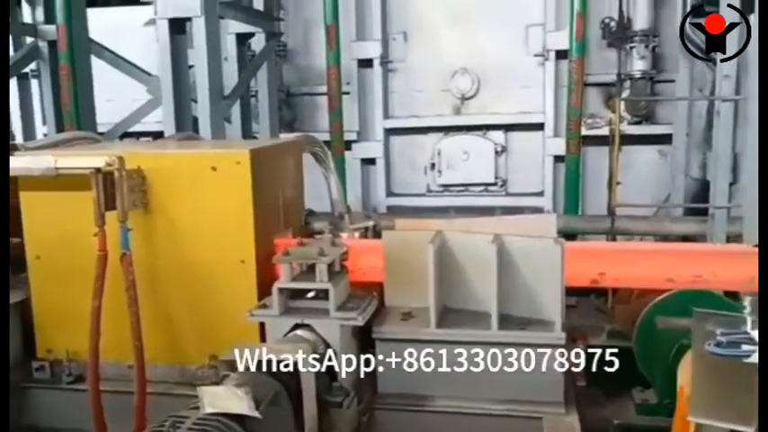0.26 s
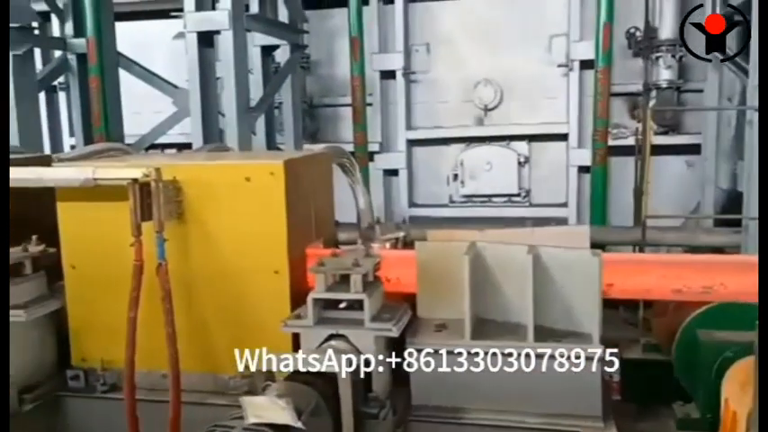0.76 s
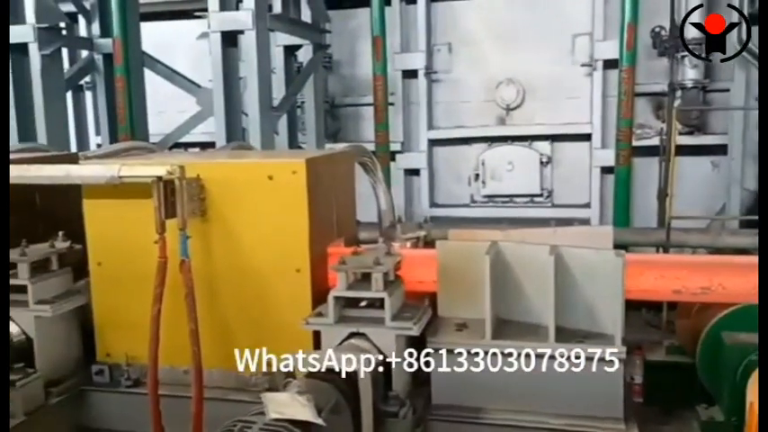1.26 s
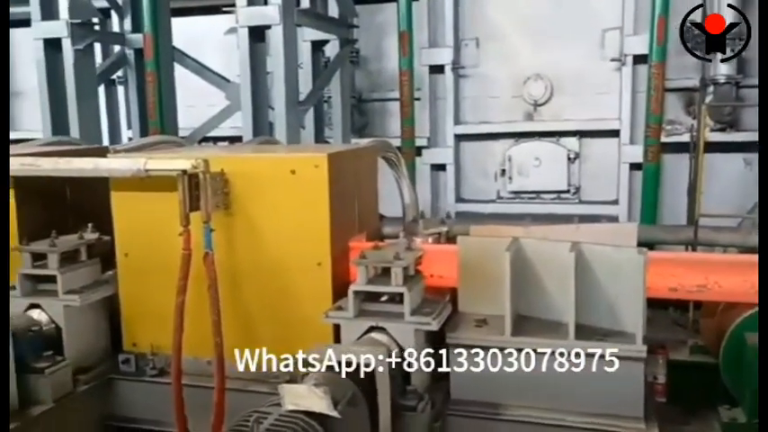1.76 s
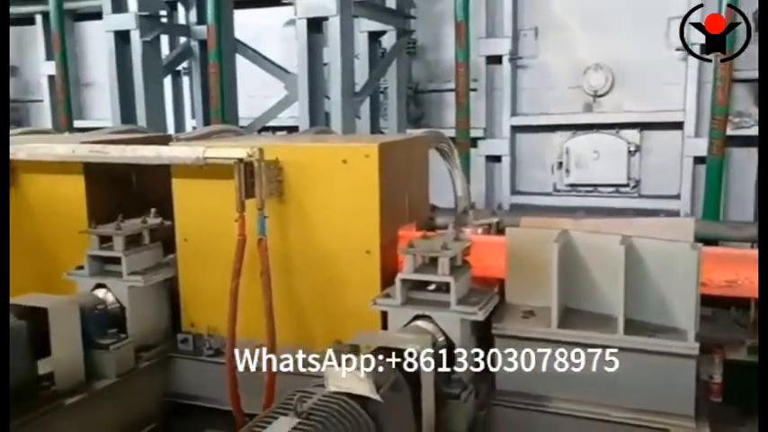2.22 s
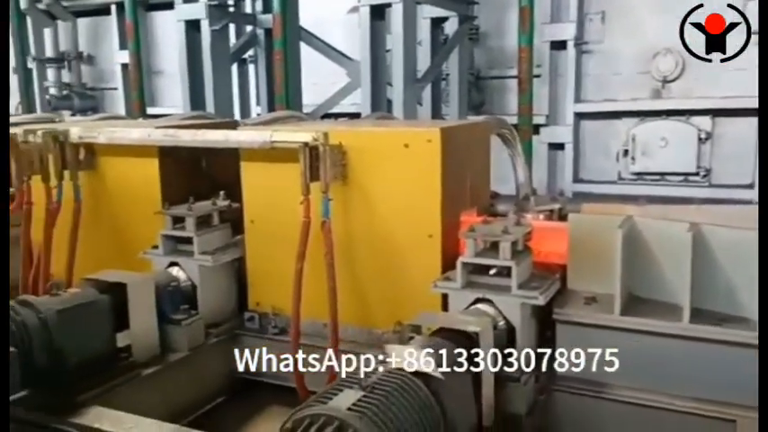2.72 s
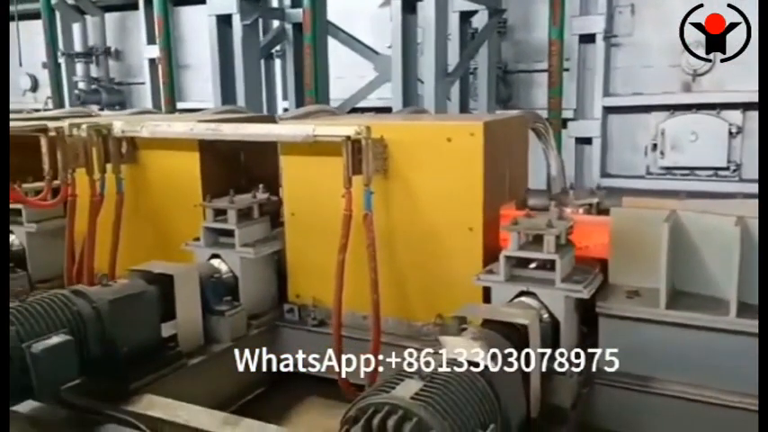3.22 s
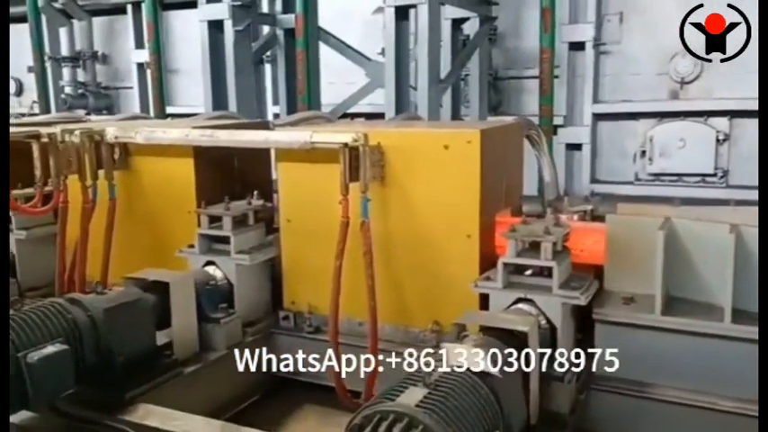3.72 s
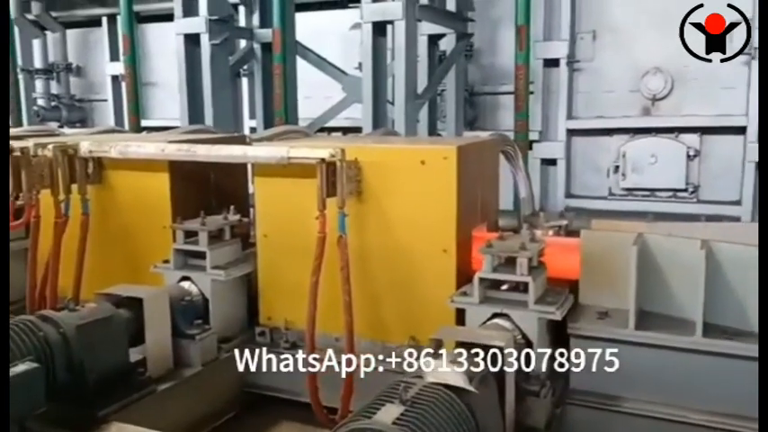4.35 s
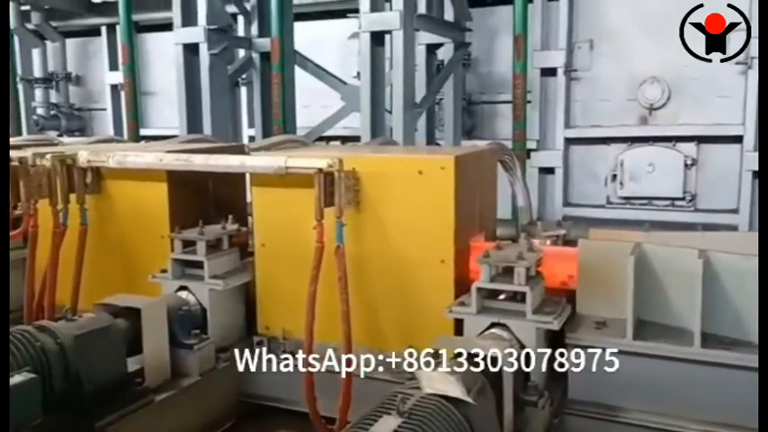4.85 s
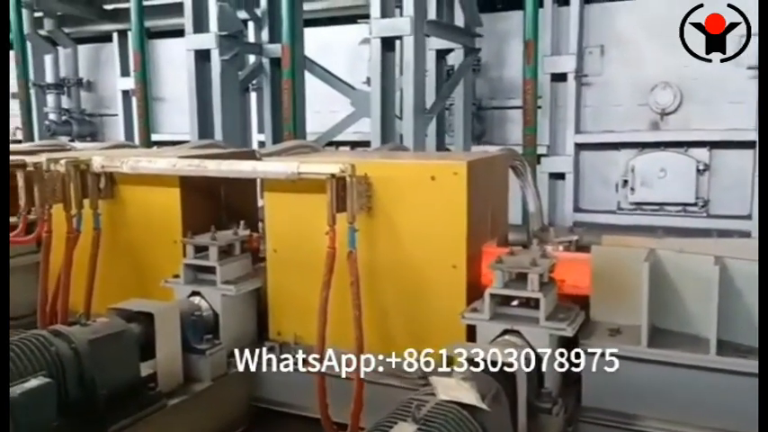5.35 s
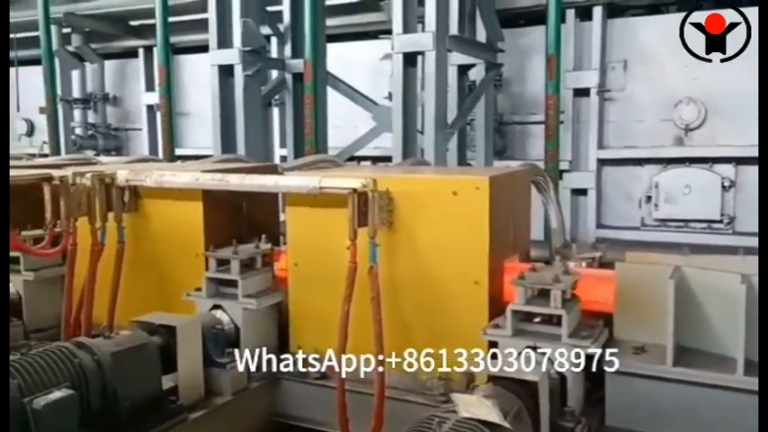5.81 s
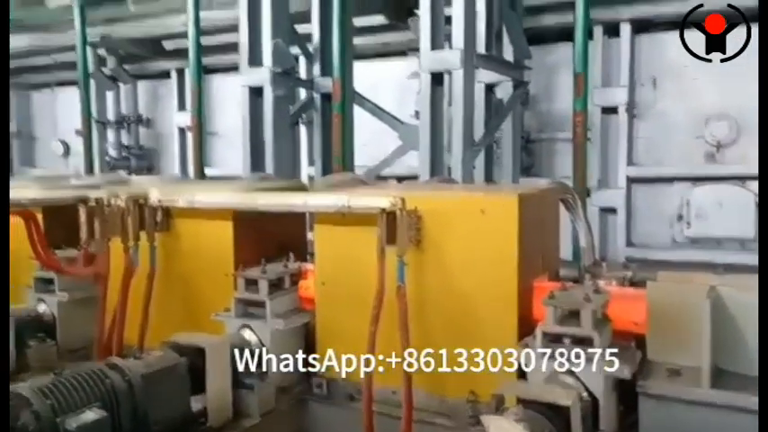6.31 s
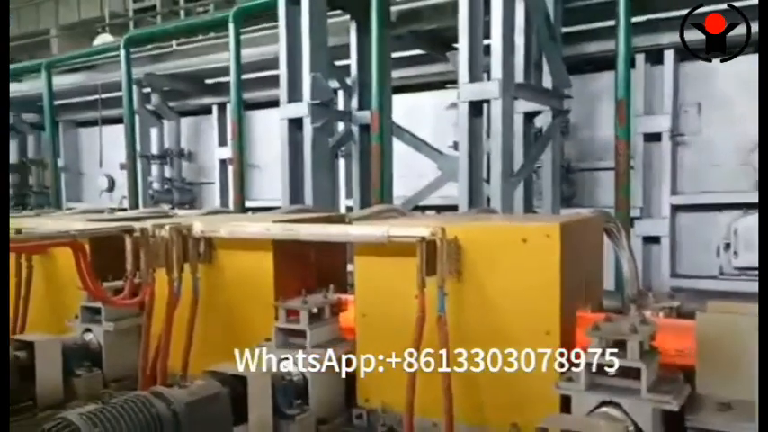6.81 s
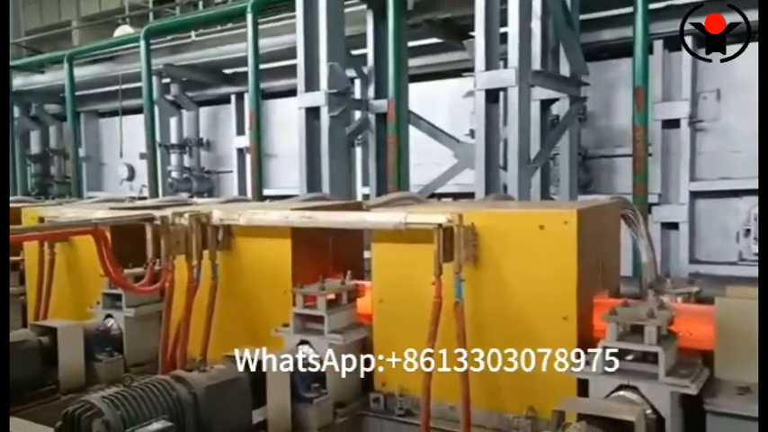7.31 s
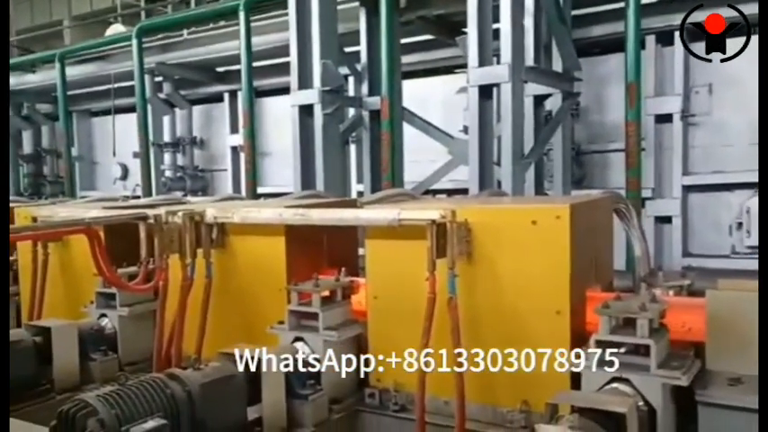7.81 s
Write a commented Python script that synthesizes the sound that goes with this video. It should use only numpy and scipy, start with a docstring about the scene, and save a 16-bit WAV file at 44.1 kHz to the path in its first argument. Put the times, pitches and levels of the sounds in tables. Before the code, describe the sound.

A loud, narrow electrical whine around 1500 Hz fills a factory hall, heard from a few metres by a moving hand-held microphone. From 0 to 3 s it creeps upward, beating with a steady, slightly lower whine, strongest near 0.6 s; the throbbing quickens as they separate. The tone swells and sinks, with a tiny dropout at 1.6 s and a deep dip near 2.2 s. Faint overtones flicker. Underneath run lumpy low conveyor rumble, dense dull roller knocks, wavering motor hum and restless water and fan hiss. Just after 3.2 s this background jumps forward and a barely audible very high whistle enters. From 3.7 s the main whine is strong, levelling near 1554 Hz by 4.5 s. Rollers ring roughly and briefly around 1.8, 4.7 and 7.7 s. A heavy rumble surge comes at 5.6 s; the background eases after 6 s, and the whine edges upward again from 7 s until the end.

```python
"""A factory hall from a few metres, walking past two induction coils that heat a steel bar.
From the start the near coil's whine climbs as its load changes, beating with a steady far coil; a dropout nicks both at 1.6 s.
After 3.2 s the recorder's gain lifts the background and a faint high whistle enters; the climb levels off by 4.5 s
and resumes near the end. Standing waves swell and cut the near coil's partials; random force and knocks make the conveyor
rumble. Drive motors hum in fading tones, filtered noise is the hiss of water and fans, and rollers ring three times."""
import sys
import numpy as np
from scipy import signal
from scipy.fft import rfft, irfft, next_fast_len
from scipy.io import wavfile
from scipy.ndimage import uniform_filter1d

SR = 44100
rng = np.random.default_rng(int(sys.argv[2]) if len(sys.argv) > 2 else 0)


def waveform_to_disk(signal):
    """Save audio, clipped to [-1, 1], as 16-bit WAV at the path in sys.argv[1]."""
    frames = np.transpose(np.atleast_2d(signal))
    scaled = np.clip(frames, -1, 1) * 32767
    samples = np.round(scaled).astype(np.int16)
    wavfile.write(sys.argv[1], SR, samples)


N = 355887
TIME = np.arange(N) / SR  # seconds


def undb(db):
    """Decibels to gain."""
    return 10 ** (np.asarray(db) / 20)


def curves(table):
    """Each column of a table, joined by straight lines in time."""
    s, *columns = np.transpose(table)
    return [np.interp(TIME, s, column) for column in columns]


def unit(x):
    """Scale to rms 1."""
    return x / np.sqrt(np.mean(x ** 2))


def bell(s, half_width):
    """A smooth rise to 1 and fall around a moment."""
    return np.exp(-((TIME - s) / half_width) ** 2)


def colour(x, points):
    """Shape a signal's spectrum by (Hz, dB) points, joined on a logarithmic frequency axis; rms 1."""
    hz, db = np.transpose(points)
    size = next_fast_len(N)
    bins = np.maximum(np.arange(size // 2 + 1) * SR / size, 1)
    gain = undb(np.interp(np.log(bins), np.log(hz), db))
    return unit(irfft(rfft(x, size) * gain, size)[:N])


def butter(x, hz, kind, order):
    """Butterworth filter."""
    return signal.sosfilt(signal.butter(order, hz, kind, fs=SR, output="sos"), x)


def walk(rate):
    """Smooth random drift with about `rate` turns a second; rms 1."""
    hold = max(int(SR / rate), 1)
    steps = np.repeat(rng.standard_normal(N // hold + 1), hold)
    smooth = uniform_filter1d(uniform_filter1d(steps, hold), hold)
    return unit(smooth[:N])


def flutter(depth_db, width_hz):
    """Fast, shallow random shiver: low-passed noise whose rms is `depth_db` against 1."""
    return undb(depth_db) * unit(butter(rng.standard_normal(N), width_hz, "low", order=3))


def partial(phase, db):
    """A sinusoid of the given rms level."""
    return np.sqrt(2) * undb(db) * np.cos(phase)


def wander(rate):
    """Complex gain of a sound that arrives by many changing paths; rms 1."""
    return (walk(rate) + 1j * walk(rate)) / np.sqrt(2)


def wavering(hz, db, rate):
    """A tone that keeps fading and returning, about `rate` times a second."""
    path = wander(rate)
    return abs(path) * partial(2 * np.pi * hz * TIME + np.angle(path), db)


def churn(x, depth_db, rate, lo_hz, hi_hz, count):
    """Let each of `count` overlapping bands of a noise swell and sink on its own."""
    size = next_fast_len(N)
    spectrum = rfft(x, size)
    hz = np.maximum(np.arange(len(spectrum)) * SR / size, 1)
    band = np.interp(np.log(hz), np.log([lo_hz, hi_hz]), [0, count - 1])
    out = 0
    for k in range(count):
        share = np.maximum(1 - abs(band - k), 0)  # neighbouring shares add up to 1
        out = out + irfft(spectrum * share, size)[:N] * undb(depth_db * walk(rate))
    return unit(out)


def cooling(gain_db):
    """Restless hiss of water and fans: coloured noise with churning bands and a level that drifts."""
    # spectrum of the hiss: pitch_hz, relative_level_db
    hiss_spectrum = [(700, -18.5), (1200, -1), (1800, 0.5), (2350, 2), (2900, -0.5), (4200, -2.5),
                     (6000, -4.5), (7000, -6.5), (7750, -9.5), (8200, -27), (10000, -27), (14000, -38),
                     (15200, -30)]
    # the hiss swells or dips briefly: centre_s, half_width_s, gain_db
    hiss_shifts = [(0.33, 0.023, 0), (2.1, 0.18, -0.5), (2.62, .035, -1.5), (2.82, 0.021, -3),
                   (2.88, .025, 1), (2.94, .02, -8), (3.03, .02, -5.5), (3.35, .06, 2), (4.0, 0.092, -3),
                   (4.2, .03, 1.5), (4.42, 0.046, -1.5), (6.2, 0.14, -1), (7.95, .15, 0)]
    hiss = colour(rng.standard_normal(N), hiss_spectrum)
    hiss = churn(hiss, depth_db=3.0, rate=50, lo_hz=1207, hi_hz=16080, count=54)
    shifts_db = sum(db * bell(s, width) for s, width, db in hiss_shifts)
    base_db, follow = -34.5, 0.79  # follow: dB for each dB of the recorder's gain
    return hiss * undb(base_db + follow * gain_db + shifts_db + 0.54 * walk(42))


def motors(gain_db):
    """Broken hum of the roller drives: tones that fade and return, following the recorder's gain."""
    # hum of drive motors and gears, before the common gain: pitch_hz, relative_level_db
    hum_tones = [(76.5, -53), (150.3, -47), (300.7, -45), (362, -51), (446, -54), (634, -51), (744, -52),
                 (775, -55)]
    hum = sum(wavering(hz, db, rate=16) for hz, db in hum_tones)
    return hum * undb(1.2 * gain_db - 3.5)


def knocks(rate, spread_db):
    """Dense little impacts of very unequal size, about `rate` a second; rms 1."""
    hit = rng.random(N) < rate / SR
    size_db = spread_db * np.minimum(rng.exponential(size=N), 4)
    return unit(hit * rng.standard_normal(N) * undb(size_db))


def conveyor(gain_db):
    """Rolling contact and small knocks shake the frame (low) and ring the rollers (middle)."""
    # spectrum of frame and rollers, each part levelled afterwards: pitch_hz, relative_level_db
    conveyor_spectrum = [(15, -57), (25, -28.5), (43, -22.5), (67, -11.5), (139, 2.5), (172, -1.5),
                         (200, 0), (228, -4), (306, -5), (431, -6.5), (476, -7.5), (618, -8.5), (705, -8.5),
                         (765, -5.5), (1250, -17.5), (1620, -49.5), (2750, -120)]
    # the conveyor labours or eases for a moment: centre_s, half_width_s, rumble_gain_db, clatter_gain_db
    surges = [(0.04, .06, 8.5, -0.5), (0.31, 0.044, 3.5, 4.5), (0.45, 0.079, 3.5, 0), (0.7, 0.033, -5, 1),
              (1.25, 0.093, 1.5, 2), (1.64, 0.08, 5, 1.5), (1.78, .025, -6, 0), (1.95, 0.031, 4, 3),
              (2.12, .06, -6, -1), (2.3, 0.044, 0, 4), (2.45, 0.036, -5.5, -0.5), (2.74, 0.056, 7.5, 2),
              (3.12, 0.061, 0, -3.5), (3.3, .1, -6.5, 2.5), (3.55, 0.044, 6, -3), (3.73, .03, -4, 0),
              (4.1, 0.14, 1, 3), (4.23, .035, 4.5, 3), (4.36, .03, -4, 1), (4.55, 0.043, 2, 4),
              (4.74, 0.077, 2, 3.5), (4.93, .03, -5.5, -1), (5.19, 0.027, -8.5, 0), (5.56, 0.041, 11, 0.5),
              (5.76, .035, 5.5, -1), (6.09, .04, 2, -1.5), (6.19, 0.038, -8.5, -4.5), (7.25, 0.18, 1, 2.2)]
    shaking = colour(rng.standard_normal(N) + 0.56 * knocks(rate=500, spread_db=1.5), conveyor_spectrum)
    shaking = churn(shaking, depth_db=2.5, rate=16, lo_hz=89, hi_hz=1290, count=14)
    split_hz = 290
    frame = unit(butter(shaking, split_hz, "low", order=4))
    rollers = unit(butter(shaking, split_hz, "high", order=4))

    low_db, middle_db = sum(np.outer(gains, bell(s, width)) for s, width, *gains in surges)
    # base level, then dB for each dB of the recorder's gain
    rumble_db = -36.5 + 1.1 * gain_db + low_db + 1.4 * walk(22)
    clatter_db = -36 + 1.03 * gain_db + middle_db + 0.22 * walk(13)
    return frame * undb(rumble_db) + rollers * undb(clatter_db)


def roller_rings():
    """Single rollers sing roughly for a moment: a fast-wavering tone under a smooth swell."""
    # a roller rings up as the bar bears on it: centre_s, half_width_s, pitch_hz, crest_level_db
    rings = [(1.8, 0.4, 773, -50), (4.7, 0.21, 633, -37), (7.7, .2, 884, -44)]
    return sum(bell(s, width) * wavering(hz, db, rate=60) for s, width, hz, db in rings)


def whistle():
    """A faint high whistle: one sine with a wandering phase."""
    # thin whistle far above the whine: time_s, level_db
    whistle_level = [(3.3, -98), (3.6, -70.5), (4.3, -71), (4.8, -81.5), (8.07, -80)]
    whistle_hz = 10110
    db, = curves(whistle_level)
    return partial(2 * np.pi * whistle_hz * TIME + 1.2 * walk(20), db)


def standing_waves(order):
    """Complex gain of one partial along the microphone's path: it swells, and each null cuts it and flips its sign."""
    # brief or broad crests and troughs where a partial swells or sags: centre_s, partial_number, half_width_s, gain_db
    swells = [(0.39, 1, 0.035, -2.5), (0.47, 1, 0.025, 2.5), (0.61, 1, .04, 3.5), (1.14, 1, 0.03, 1),
              (1.31, 1, .025, -3), (1.4, 1, 0.077, 1), (2.8, 1, .03, 0.5), (2.94, 1, 0.017, -1),
              (3.03, 1, 0.034, 1.5), (3.42, 1, 0.039, 4.5), (3.95, 1, 0.064, 3.5), (4.41, 1, 0.038, -2),
              (4.68, 1, .04, -1.2), (7.06, 1, .05, -1), (7.38, 1, .04, 1.4), (7.47, 1, 0.032, -1.5),
              (7.67, 1, 0.17, 4), (0.57, 2, 0.059, 6), (0.86, 2, 0.06, -6), (0.97, 2, 0.034, 3.5),
              (1.2, 2, .05, -2), (1.48, 2, 0.071, -7), (1.58, 2, 0.029, 1.5), (1.86, 2, 0.033, 3.5),
              (2.18, 2, 0.17, 3), (2.56, 2, 0.13, 5.5), (2.92, 2, 0.021, -8), (3.44, 2, 0.16, 9.5),
              (5.45, 2, 0.47, 2.5), (6.7, 2, 0.59, -2.5), (7.28, 2, 0.15, -6), (7.9, 2, 0.56, 4),
              (0.3, 3, .06, 5.5), (0.52, 3, 0.1, 10), (0.68, 3, 0.038, -7), (0.8, 3, 0.075, 10.5),
              (1.15, 3, 0.2, 8.5), (1.55, 3, 0.093, 2), (2.38, 3, 0.3, 7), (3.13, 3, 0.062, 7.5),
              (3.61, 3, 0.083, 9.5), (3.76, 3, 0.066, 6.5), (5.25, 3, 0.35, 3.5), (5.75, 3, 0.11, 3),
              (7.63, 3, 0.078, 8), (7.95, 3, 0.13, 3.5), (0.62, 4, 0.05, 14), (0.87, 4, 0.045, 13),
              (2.5, 4, 0.092, 6.5), (2.93, 4, .1, 8), (3.68, 4, 0.25, 9.5), (4.25, 4, 0.41, 11),
              (5.1, 4, .27, 4), (6.25, 4, .2, 6), (6.76, 4, 0.097, 4.5), (7.2, 4, 0.23, 10.5),
              (7.6, 4, .05, 6), (7.9, 4, 0.12, 10)]
    # the microphone crosses a null; echoes leave a little: centre_s, partial_number, half_width_s, remainder_db
    nodes = [(0.8, 1, 0.15, -12), (2.25, 1, 0.17, -24), (3.33, 1, 0.067, -18), (0.24, 2, 0.1, -20),
             (0.419, 2, 0.055, -15), (0.745, 2, 0.11, -19.5), (1.68, 2, 0.073, -25), (1.99, 2, 0.11, -12),
             (2.79, 2, 0.2, -26), (3.82, 2, 0.065, -12), (4.08, 2, 0.077, -7), (6.69, 2, 0.074, -5),
             (0.18, 3, 0.07, -20), (0.41, 3, 0.025, -15), (1.8, 3, 0.2, -21.5), (2.77, 3, .04, -18),
             (2.99, 3, 0.06, -21), (3.3, 3, 0.064, -17), (4.58, 3, 0.64, -17.5), (6.28, 3, 0.13, -14),
             (6.53, 3, .06, -13), (6.97, 3, 0.11, -19), (7.38, 3, 0.054, -18), (0.25, 4, .12, -21),
             (2.1, 4, .35, -12), (3.3, 4, .2, -20), (5.65, 4, 0.24, -9.5), (6.07, 4, .06, -11),
             (6.56, 4, .05, -16), (6.95, 4, 0.068, -15), (7.5, 4, .04, -12), (7.72, 4, .04, -16)]
    gain = undb(sum(db * bell(s, width) for s, k, width, db in swells if round(k) == order))
    for s, k, width, remainder_db in nodes:
        if round(k) == order:
            direct = np.tanh((s - TIME) / width)
            remainder = 1j * undb(remainder_db) * bell(s, width)
            gain = gain * (direct - remainder)
    return gain


def coil(hz, levels_db, paths, ripple_db, shiver_db, jitter_db):
    """Magnetic force shakes the windings at the inverter's pitch and its multiples; pitch ripples, power shivers."""
    ripple_hz = 34.8
    sway = 0.069 * walk(22)  # the hand-held microphone moves through the waves
    ripple = undb(ripple_db) * np.sin(2 * np.pi * ripple_hz * TIME + 0.49 * walk(0.98))
    phase = 2 * np.pi * np.cumsum(hz) / SR + sway + flutter(depth_db=jitter_db, width_hz=88)
    power = 1 + flutter(depth_db=shiver_db, width_hz=70) + 0.042 * walk(18)
    out = 0
    for k, (db, path) in enumerate(zip(levels_db, paths), 1):
        if k > 1:  # scattered echoes join the overtones: a strong one stays firm, a weak one flickers
            echo_db = -13 + 8 * (k - 2)  # echoes grow and turn faster with each higher partial
            path = path + undb(echo_db) * wander(24 * k)
        out = out + abs(path) * partial(k * phase + ripple + np.angle(path), db)
    return power * out


def far_coil():
    """The steady whine a little lower, which beats with the near one."""
    # far coil, before echoes and shiver: time_s, fundamental_level_db, second_partial_level_db
    far_levels = [(0.0, -50, -49), (0.25, -33, -43), (0.6, -16.5, -46), (1.0, -24.5, -50),
                  (1.3, -24.5, -49.5), (2.1, -27, -47), (2.6, -24, -45.5), (3.05, -30, -54),
                  (3.25, -30.5, -33), (3.42, -25.5, -37), (3.57, -31, -44), (3.75, -37.5, -35.5),
                  (4.8, -34.5, -35), (5.6, -26.5, -32), (6.15, -30.5, -40), (6.8, -37, -39.5),
                  (7.0, -37, -42.5), (7.2, -32.5, -37), (7.5, -29.5, -33.5), (8.07, -32, -37.5)]
    far_hz = 1484.3
    third_db = -53 + 3.2 * walk(10)
    levels_db = curves(far_levels) + [third_db]
    paths = np.ones(len(levels_db))
    return coil(np.full(N, far_hz), levels_db, paths, ripple_db=-19.5, shiver_db=-18.0, jitter_db=-29.0)


def near_coil(gain_db):
    """The loud whine, with three overtones: it glides up, levels off and edges up again."""
    # inverter pitch: time_s, pitch_hz
    near_pitch = [(0.0, 1496.0), (0.3, 1500.2), (0.6, 1504.1), (0.85, 1507.8), (1.15, 1511.9),
                  (1.4, 1514.6), (1.65, 1520.1), (2.0, 1524.3), (2.5, 1532.8), (3.0, 1540.3), (3.5, 1546.5),
                  (4.0, 1551.7), (4.5, 1553.7), (5.0, 1554.2), (6.0, 1554.1), (7.0, 1554.7), (7.5, 1557.4),
                  (8.07, 1563.8)]
    # fundamental at the microphone, before standing waves and shiver: time_s, level_db
    near_level = [(0.0, -13.8), (0.27, -13.8), (0.4, -17.5), (1.1, -18.7), (1.33, -25), (1.6, -24),
                  (1.92, -18.5), (2.06, -25), (2.45, -16.3), (2.8, -15), (3.2, -20.5), (3.52, -18),
                  (3.66, -11.2), (4.45, -13.3), (5.3, -11), (6.3, -11.1), (7.2, -12.8), (8.07, -11.3)]
    # second to fourth partials at 0 dB recorder gain, before standing waves and echoes: level_db
    overtones_db = [-31.5, -43.5, -51]
    overtone_follow = 0.93  # dB for each dB of the recorder's gain
    hz, = curves(near_pitch)
    levels_db = curves(near_level) + [db + overtone_follow * gain_db for db in overtones_db]
    paths = [standing_waves(order=k + 1) for k in range(len(levels_db))]
    return coil(hz, levels_db, paths, ripple_db=-31.5, shiver_db=-25.5, jitter_db=-26.5)


def scene():
    """Both coils over the machinery, with the recorder's gain on background and overtones."""
    # the recorder's gain on rumble, clatter, hum, hiss and the near coil's overtones: time_s, gain_db
    recorder_gain = [(0.0, -1.5), (0.25, -3), (0.65, 4.5), (0.88, 1), (1.03, -4), (1.6, -4.5), (2.4, -5.5),
                     (3.2, -6), (3.31, 2), (4.0, 2.5), (4.7, 3), (5.1, 2.5), (5.65, 2.7), (6.2, -0.5),
                     (6.8, -1), (7.5, -0.7), (8.07, -1.5)]
    dropout = [(1.595, 0), (1.62, -9), (1.631, 2), (1.655, 0)]
    gain_db, = curves(recorder_gain)
    dropout_db, = curves(dropout)
    machinery = cooling(gain_db) + motors(gain_db) + conveyor(gain_db) + roller_rings()
    whine = (far_coil() + near_coil(gain_db)) * undb(dropout_db)
    return (machinery + whistle() + whine)[None]


def record(dry):
    """The phone cuts the top with a steep elliptic low-pass."""
    top_hz = 15700
    return signal.sosfilt(signal.ellip(8, .1, 70, top_hz, fs=SR, output="sos"), dry)


dry = scene()
out = record(dry)
waveform_to_disk(out)
```